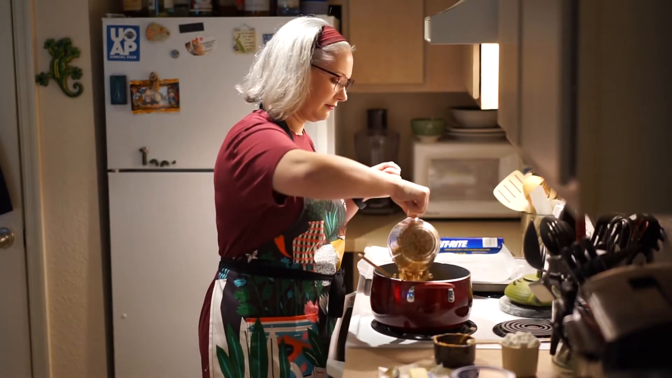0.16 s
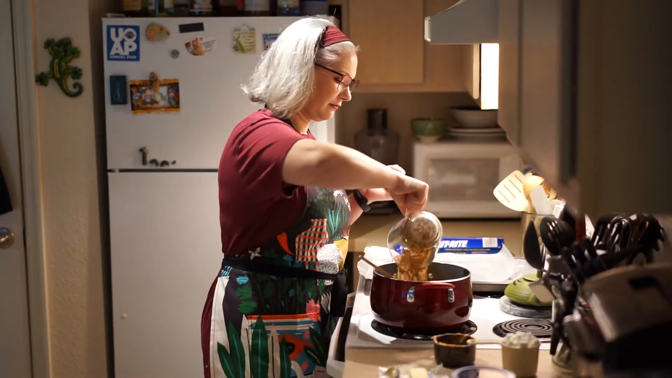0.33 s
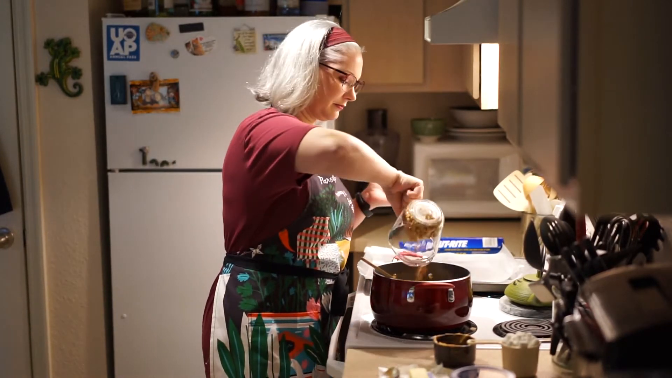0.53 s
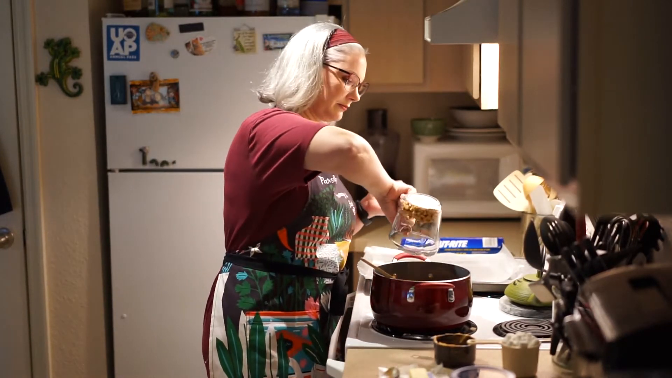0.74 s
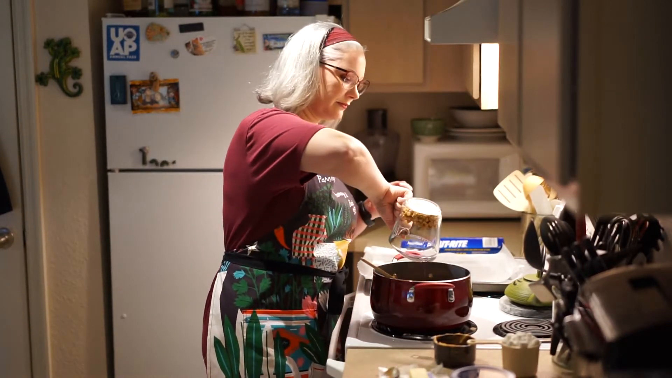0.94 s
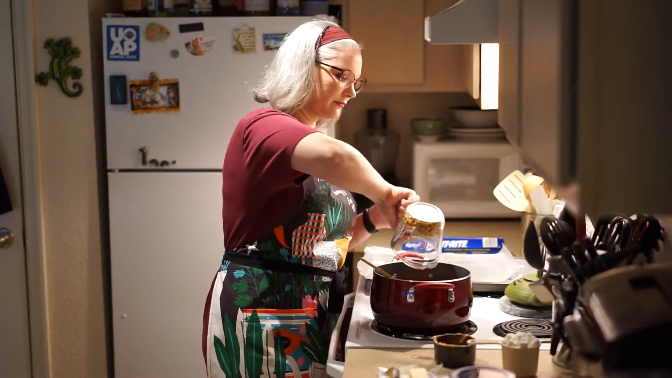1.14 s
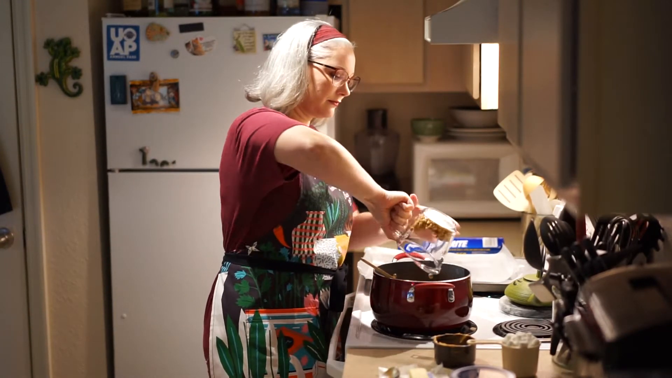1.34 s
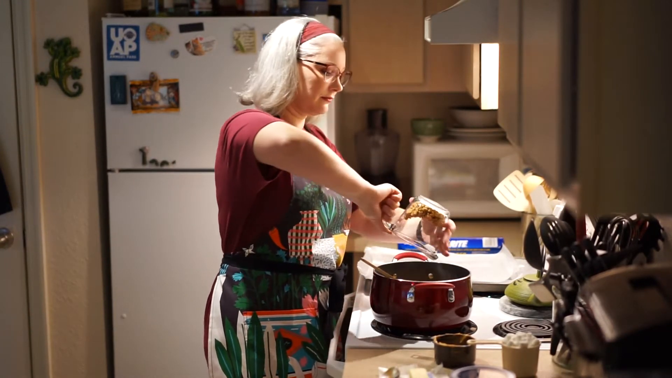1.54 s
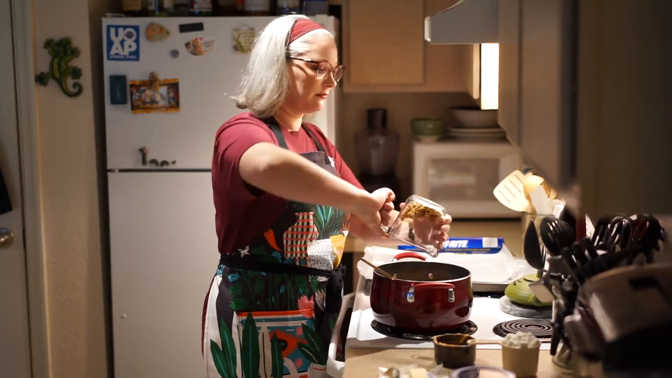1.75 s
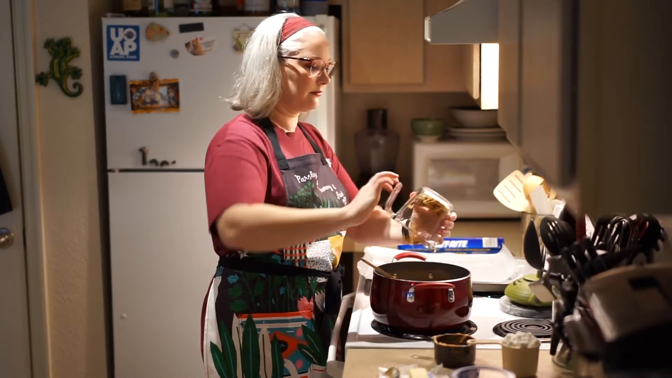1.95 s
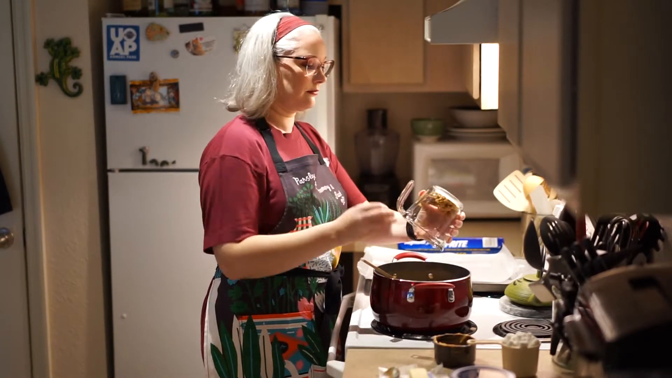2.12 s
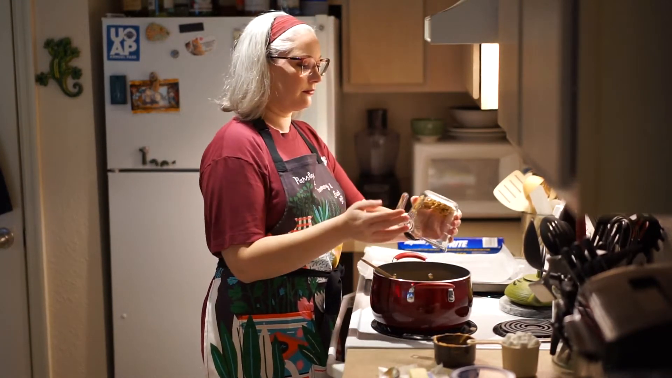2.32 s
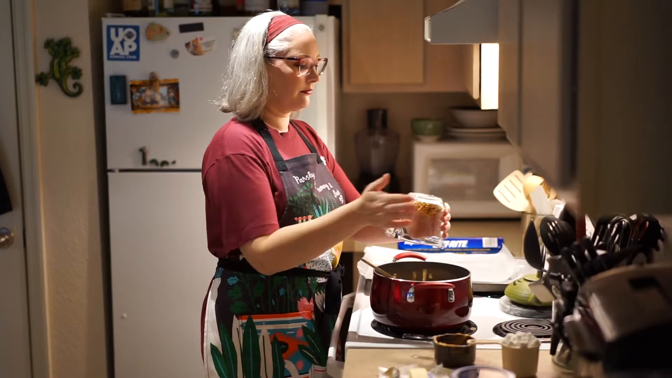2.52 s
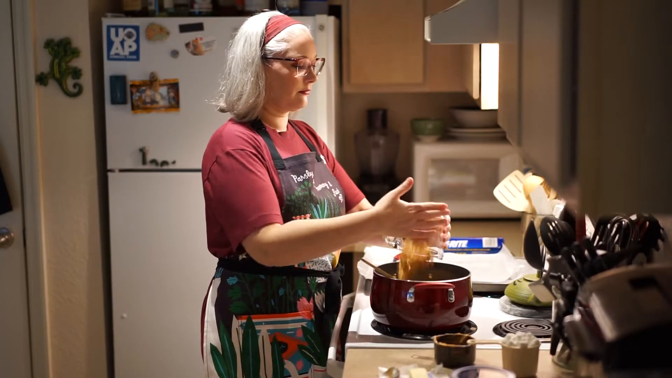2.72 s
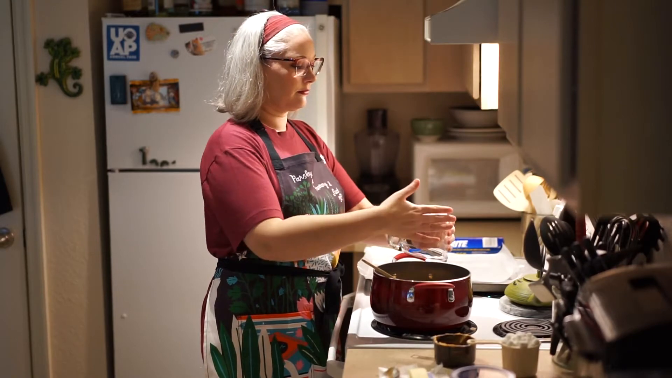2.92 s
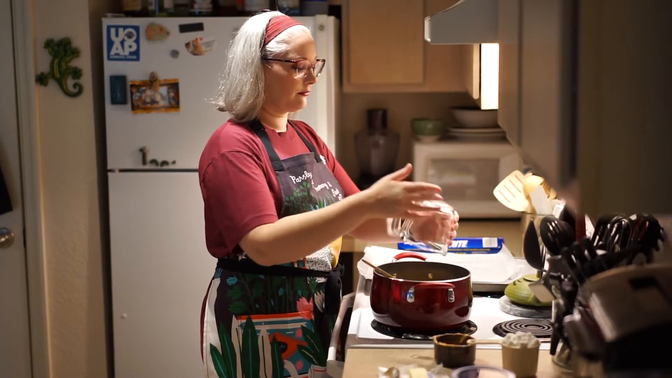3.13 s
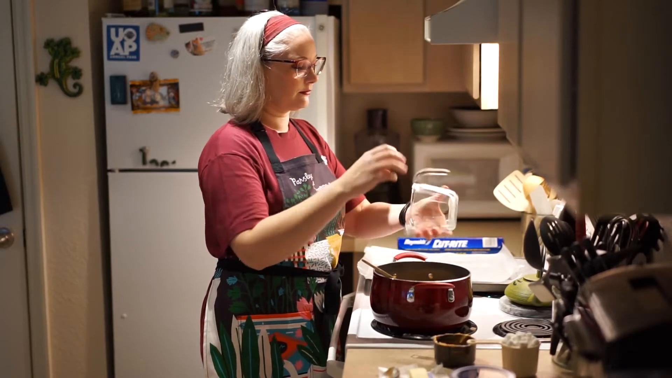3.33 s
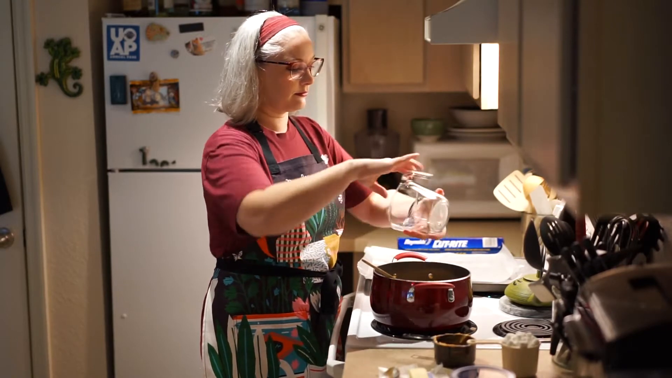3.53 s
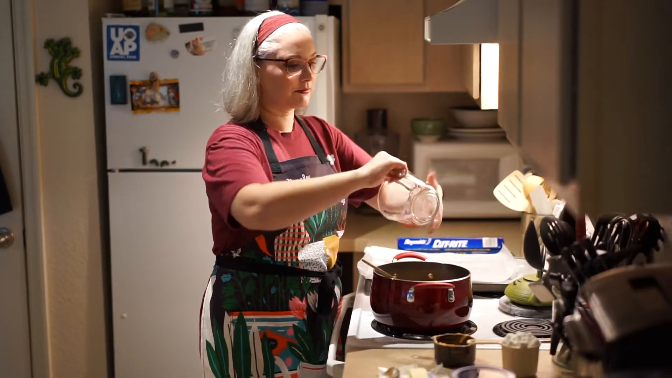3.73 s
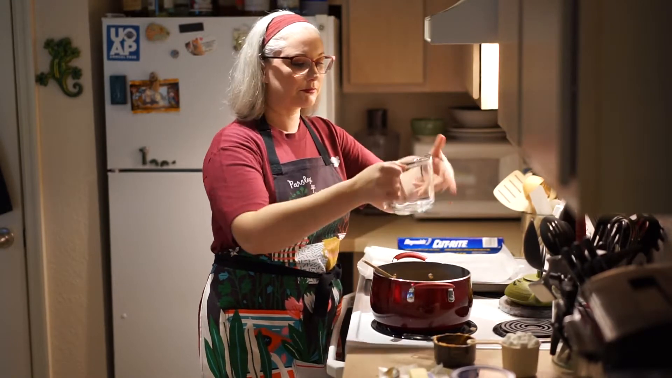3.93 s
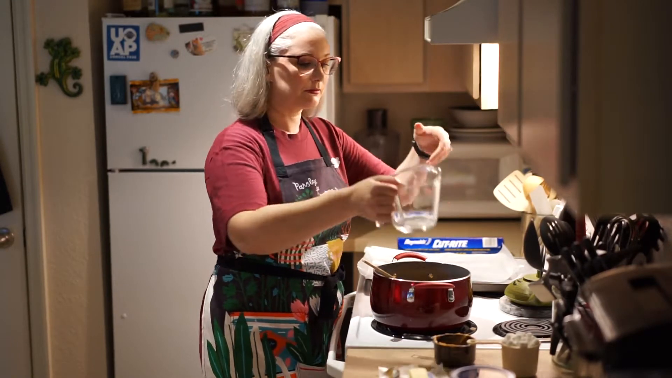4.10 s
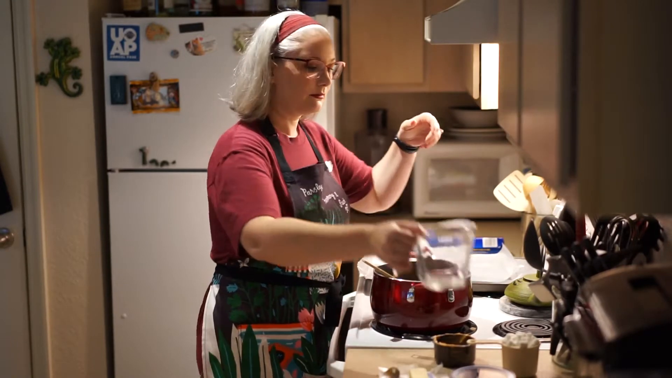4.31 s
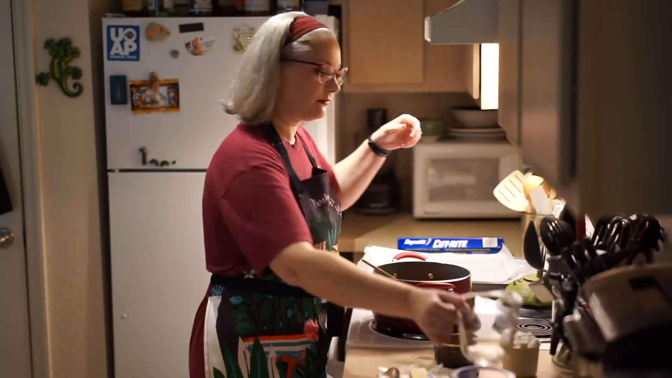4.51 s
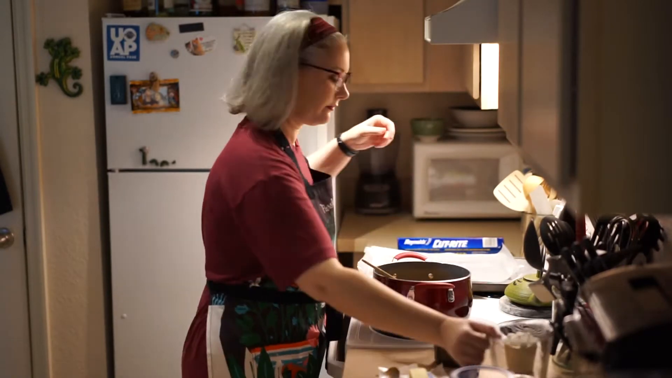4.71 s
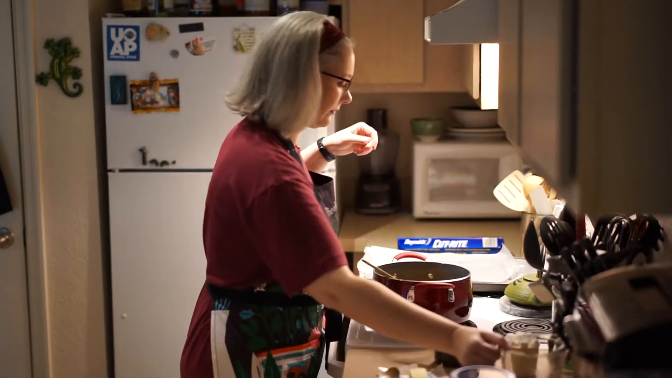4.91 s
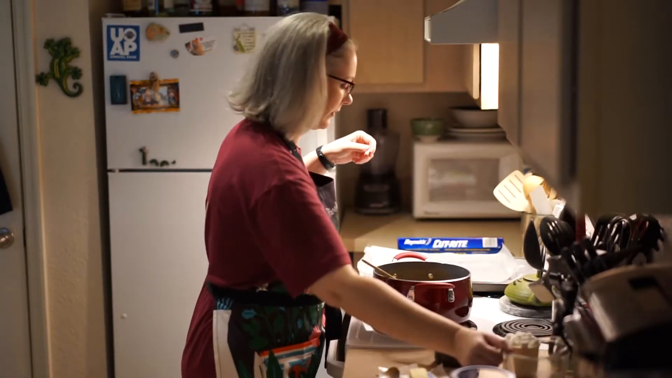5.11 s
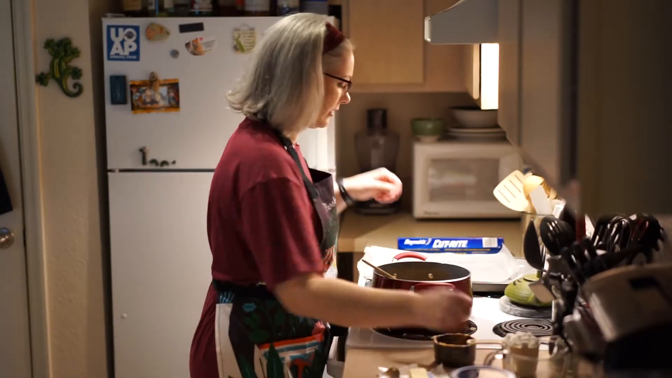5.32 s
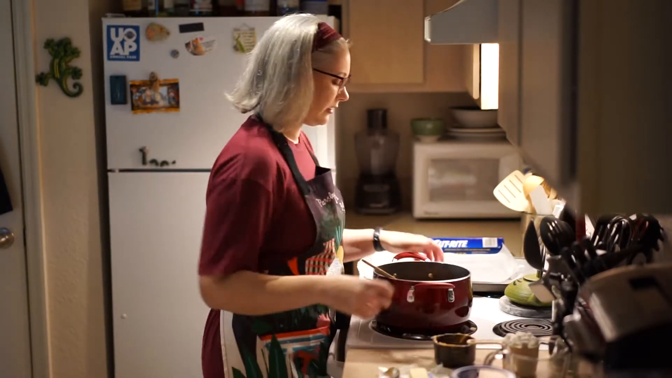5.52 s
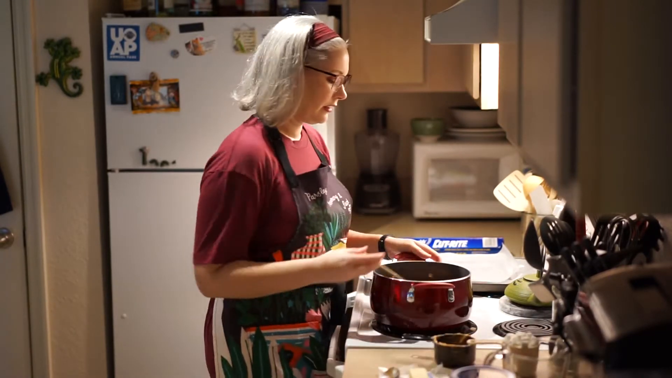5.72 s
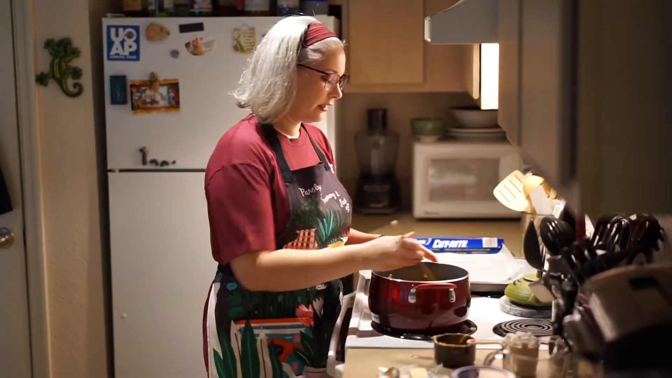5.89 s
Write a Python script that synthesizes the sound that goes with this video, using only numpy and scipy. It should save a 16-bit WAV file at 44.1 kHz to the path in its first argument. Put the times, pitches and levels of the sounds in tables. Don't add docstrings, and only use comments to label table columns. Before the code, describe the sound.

Close stereo pickup in a small echoing kitchen with low refrigerator hum. Dry hard chips stream from a glass jug into a metal pot, thin out, then burst out in loud shakes. Sparser rattles and a palm slap follow, then a pause, one sharp double knock of the jug on a wooden counter, and a faint cloth rustle.

```python
import sys
import numpy as np
from scipy import signal
from scipy.io import wavfile

SR = 44100
rng = np.random.default_rng(int(sys.argv[2]) if len(sys.argv) > 2 else 0)


def magnitude_from_level(level_db):
    exponent = np.asarray(level_db, float) / 20
    return 10 ** exponent


def store_pcm(level_fs):
    pcm = np.round(np.clip(level_fs, -1, 1) * 32767).astype(np.int16)
    wavfile.write(sys.argv[1], SR, np.atleast_2d(pcm).T)


N = 262515

BAND_EDGES = 22 * 2 ** np.arange(0, 9.7, .4)

# [f/Hz, level/dB per Hz]
PATTER = [(350, -30), (600, -19), (790, -12.5), (931, -11.5), (1070, -17), (1780, -8), (1880, -8),
          (3630, -9.5), (9110, -17), (14500, -39.5), (16000, -50)]
# [f/Hz, level/dB, t60/s]
POT = [(485.6, 0.1, 0.12), (795, -9.5, 0.077), (1060, -3.5, 0.16), (1630, -2, 0.062), (1880, 1, 0.016),
       (2140, -12, 0.035), (2540, -12, 0.03), (2730, -15, 0.034)]
# [f/Hz, level/dB, t60/s]
GLASS = [(3154, 2, 0.007), (3600, -18.5, 0.068), (3780, 4, 0.0086), (3900, -14.5, 0.019), (4650, -10, 0.02),
         (5000, -5, 0.018), (5130, -6, 0.017), (6150, 1, 0.0086), (6485, -5, 0.012), (6870, -7, 0.013),
         (7330, -12, 0.022), (7730, -11, 0.02)]
# [t/s, level/dB]
POUR = [
    (0.0, -25),
    (0.06, -31),
    (0.15, -30.5),
    (0.36, -33.5),
    (0.41, -34),
    (0.435, -30),
    (0.55, -39),
    (0.605, -43.5),
]
# [t/s, hold/s, level/dB, treble level/dB, glass level/dB]
SURGES = [(0.61, 0.069, -30, -5, 4), (0.705, 0.077, -25, -0.5, 7.5), (0.824, 0.1, -38, -5, -20),
          (1.276, 0.0034, -29.5, 4.5, -25), (1.33, .02, -41, -4, -19), (1.567, 0.025, -48.5, 5.5, -20),
          (1.891, 0.0023, -24.5, -21, 3), (1.905, 0.084, -36.5, -12, -1), (2.076, 0.051, -24.5, 0.9, 5),
          (2.136, 0.037, -42, -14, 13), (2.58, 0.05, -49, 2.5, -15), (2.63, 0.0037, -32, 0, 3),
          (2.751, 0.019, -48.5, 4.5, -11), (2.801, 0.043, -22, 2.5, 6.5), (2.84, .05, -42, 9, -5),
          (2.889, 0.15, -39, 3, -14)]
# [f/Hz, level/dB per Hz]
HUM = [(12, -40), (20, -5.5), (102, -7), (147, -10), (250, -12.5), (350, -12), (380, -31), (414, -12),
       (766, -14), (834, -16.5), (1070, -22.5), (1380, -23.5), (3030, -30), (15000, -40), (16300, -52)]
# [f/Hz, width/Hz, level/dB]
DRONES = [(95.9, 8.6, -53.5), (122.5, 9.2, -55), (248.7, 8.4, -63), (360.3, 20, -60), (452, 28, -61)]
# [f/Hz, correlation/1]
HUM_LIKENESS = [(60, 0.91), (180, 0.79), (550, 0.81), (1650, 0.53), (4970, -1.07), (15000, -0.08)]
# [f/Hz, t60/s, echo level/dB]
ROOM = [(100, 0.95, -9), (422, 0.4, -0.5), (1500, 0.29, -1.5), (4000, 0.34, -0.5), (7700, 0.36, 2.5),
        (14000, 0.25, 6.5)]
# [f/Hz, correlation/1]
ROOM_LIKENESS = [(200, 1), (800, 0.84), (2000, 0.34), (6000, 0.08)]
# [t/s, lowest mode level/dB, higher modes level/dB]
DROPS = [(0.014, -51, -41), (0.046, -24, -39), (0.108, -21, -35), (0.133, -47, -33.5), (0.181, -51, -37),
         (0.226, -28.5, -35.5), (0.292, -28, -44), (0.332, -42, -38), (0.368, -31, -55), (0.5, -28, -44),
         (0.576, -49, -46), (2.083, -34.5, -37), (2.109, -39, -50), (2.814, -22.5, -38), (2.835, -34, -54),
         (2.859, -58, -38.5)]
# [t/s, level/dB, f/Hz, t60/s]
TINKS = [(0.044, -25.5, 1060, 0.11), (0.129, -35, 1055, 0.086), (0.184, -38, 1045, .08),
         (2.911, -45, 1060, 0.12), (1.166, -58, 8300, .16), (1.499, -44, 3466, 0.091),
         (1.499, -57, 6550, 0.061), (1.499, -61, 10600, 0.052), (1.568, -46.5, 1060, 0.17),
         (1.897, -29, 820, 0.066), (2.121, -40, 349, 0.32), (2.635, -27, 1396, 0.05),
         (2.812, -31, 414, 0.088), (2.838, -37.5, 350, 0.14), (4.381, -52, 1410, 0.14)]
# [t/s, peak level/dB, colour f/Hz]
POUR_CLUMPS = [(0.0574, -15.5, 3180), (0.1396, -15.5, 3720), (0.17, -16.5, 3780), (0.1824, -15, 3940),
               (0.2031, -17, 3150), (0.2583, -16.5, 3880), (0.2794, -18.5, 3840), (0.3262, -28, 3600),
               (0.3494, -23, 3680), (0.3785, -22, 3720), (0.3884, -18.5, 3850), (0.4289, -14, 3780),
               (0.4734, -43, 3800)]
# [t/s, peak level/dB, colour f/Hz, treble level/dB]
SHAKE_CLUMPS = [(0.6104, -11.5, 3900, -2), (0.6482, -13.5, 3070, -3), (0.6683, -13.5, 3450, 3),
                (0.6839, -10.5, 3550, 4), (0.7099, -8, 3530, -7), (0.7688, -11, 3460, 6.5),
                (0.8793, -29.5, 3440, -19), (0.9966, -34.5, 3120, 4.5), (1.1676, -43, 8300, -10),
                (1.273, -19, 4900, 11.5), (1.3314, -31, 2610, -14), (1.499, -34, 6360, -12),
                (1.571, -42, 3040, 16.5), (1.8904, -8, 3600, -3.5), (2.0756, -15, 5270, 12),
                (2.1037, -11.5, 3960, -6), (2.147, -12.5, 3020, 2), (2.153, -9.5, 3100, -2),
                (2.5775, -39, 3260, -6), (2.605, -31.5, 3730, 7.5), (2.7606, -49, 4330, -6),
                (2.7971, -9.5, 6750, -13), (2.8075, -11, 5040, 0), (2.8214, -10.5, 2880, 13.5),
                (2.9183, -16, 7600, 9)]
# [t/s, level/dB, decay/s]
SLAPS = [
    (2.6333, -11.5, 0.0019),
    (2.637, -19.5, 0.0056),
]
# [f/Hz, level/dB per Hz]
PALM = [(290, -38), (500, -15), (936, -16), (1300, 2), (1700, -1.5), (2220, -4), (3200, -16), (6500, -31),
        (14000, -41)]
# [t/s, push level/dB, rough contact level/dB]
KNOCKS = [
    (4.9335, -3, -10.5),
    (4.9525, -10.5, -14.5),
    (4.987, -33, -22.5),
    (5.017, -26, -25),
]
# [f/Hz, level/dB, t60/s]
COUNTER = [(433, 16, 0.0085), (131, -27, 0.3), (179, -18, .6), (198, -15, 0.68), (279.7, -12, 0.75),
           (350, -20, 0.11), (397, -5.5, 0.14), (515, -3.5, 0.14), (568, -3.5, 0.096), (617, -11, .17),
           (621, -15, 0.11), (846, -14, 0.099), (958, -7.5, 0.12), (1160, -10, 0.045)]
# [f/Hz, level/dB per Hz]
THUD = [(40, -21), (100, -21), (200, -2), (380, -5.5), (600, 2), (1000, -6.5), (2000, -19), (3500, -32.5),
        (6000, -36), (8500, -54), (12000, -55), (16000, -60)]
# [f/Hz, level/dB, t60/s]
JUG_BASE = [(4480, -41.5, .03), (8170, -46, 0.015), (8300, -50, .03), (9830, -47, .015), (9850, -45, 0.014),
            (13880, -59, .04), (14300, -60, .02)]
# [f/Hz, level/dB per Hz]
CLOTH = [(290, -7), (500, 0), (1130, -3.5), (1320, -8), (2570, -2.5), (2760, -8.5), (7260, -22),
         (15000, -45)]

LOAD_S = 0.61


def rms_one(x):
    return x / np.sqrt(np.mean(x ** 2) + 1e-20)


def at_hz(points, hz):
    table = np.array(points)
    return np.interp(np.log(hz), np.log(table[:, 0]), table[:, 1])


def band_pass(x, low, high):
    return signal.sosfilt(signal.butter(2, [low, high], "band", fs=SR, output="sos"), x)


def bank(x, spectrum):
    out = 0
    for k, (low, high) in enumerate(zip(BAND_EDGES, BAND_EDGES[1:])):
        if high > spectrum[0][0]:
            gain = magnitude_from_level(at_hz(spectrum, np.sqrt(low * high)))
            out = out + (-1) ** k * gain * band_pass(x + 1e-18, low, high)
    return out


def ring(clicks, hz, t60):
    r = magnitude_from_level(-60 / (max(t60, .002) * SR))
    w = 2 * np.pi * hz / SR
    return signal.lfilter([0, np.sin(w)], [1, -2 * r * np.cos(w), r * r], clicks + 1e-18)


def body(clicks, modes):
    return sum(magnitude_from_level(db) * ring(clicks * rng.standard_normal(len(clicks)), hz, t60)
               for hz, db, t60 in modes)


def grains(per_s, spread_db):
    sizes = magnitude_from_level(spread_db * np.minimum(rng.exponential(1, N), 4)) * rng.choice([-1, 1], N)
    return rms_one(sizes * (rng.random(N) < per_s / SR))


def blows(rows):
    return sum(magnitude_from_level(row[1]) * (np.arange(N) == round(row[0] * SR)) for row in rows)


def burst(s, db, length):
    out, t = np.zeros(N), np.arange(1500) / SR
    start = round(s * SR)
    decay = np.exp(-t / max(length, .0005))
    out[start:start + len(t)] = rng.standard_normal(len(t)) * decay * magnitude_from_level(db)
    return out


def tilted(contacts, treble):
    dull = signal.sosfilt(signal.butter(4, 8500, fs=SR, output="sos"), contacts)
    return dull + treble * (contacts - dull)


def bottom(clicks):
    hz, db, t60 = POT[0]
    t = np.arange(len(clicks)) / SR
    sinking_hz = hz - 31 * np.minimum(t / LOAD_S, 1)
    turn = np.exp(2j * np.pi * np.cumsum(sinking_hz) / SR)
    envelope = signal.lfilter([1], [1, -magnitude_from_level(-60 / (t60 * SR))], clicks / turn + 1e-18)
    return np.imag(turn * envelope)


def pot_wall(clicks, modes):
    t = np.arange(len(clicks)) / SR
    bare = magnitude_from_level(-13 * np.clip(t / LOAD_S - 1, 0, 1))
    lowest = magnitude_from_level(modes[0][1]) * bottom(clicks * bare * rng.standard_normal(len(clicks)))
    return lowest + body(clicks, modes[1:])


def surge(hold, db):
    age = np.arange(SR // 2) / SR
    level_db = db - 21 * age - 600 * np.maximum(age - hold, 0)
    attack = np.clip(age / 0.0074 + .5, 0, 1)
    return magnitude_from_level(np.minimum(level_db, db)) * attack, np.clip(age, 0, .3)


def flows():
    t = np.arange(N) / SR
    pour = magnitude_from_level(np.interp(t, *np.transpose(POUR), left=-200, right=-200))
    pot_db = 1.0 - 13 * t
    out = pour * np.array([np.ones(N), np.full(N, magnitude_from_level(-0.3)), magnitude_from_level(pot_db), np.full(N, magnitude_from_level(1.5))])
    for start, hold, db, treble_db, glass_db in SURGES:
        level, age = surge(hold, db)
        treble = magnitude_from_level(treble_db - 40 * age)
        where = slice(round(start * SR), round(start * SR) + len(age))
        out[:, where] += [level, level * treble, level * magnitude_from_level(-11), level * magnitude_from_level(glass_db)]
    return out


def streams():
    patter, bright, pot, glass = flows()
    contacts = grains(per_s=1500, spread_db=2.5)

    def level(tool, table):
        return np.std(tool(contacts[:SR], table))

    chips = bank(tilted(contacts, bright / (patter + 1e-12)) * patter, PATTER)
    return (chips / level(bank, PATTER) * magnitude_from_level(-4.5)
            + pot_wall(contacts * pot, POT) / level(pot_wall, POT) * magnitude_from_level(-8.0)
            + body(contacts * glass, GLASS) / level(body, GLASS) * magnitude_from_level(-11.0))


def stereo_bands(size, likeness):
    white = rng.standard_normal((2, 2, size))
    for k, (low, high) in enumerate(zip(BAND_EDGES, BAND_EDGES[1:])):
        centre = np.sqrt(low * high)
        mid, side = band_pass(white[k % 2], low, high)
        alike = np.clip(at_hz(likeness, centre), 0, 1)
        yield centre, np.sqrt(1 + alike) * mid + np.sqrt(1 - alike) * side * [[1], [-1]]


def hum():
    air = rms_one(sum(magnitude_from_level(at_hz(HUM, hz)) * band for hz, band in stereo_bands(N, HUM_LIKENESS)))
    drones = sum(magnitude_from_level(db) * rms_one(ring(rng.standard_normal(N), hz, 2.55 / width))
                 for hz, width, db in DRONES)
    return magnitude_from_level(-49) * air + drones


def kitchen(x, gap_s, early_db, early_s):
    t, tail, room = np.arange(SR // 2) / SR, 0, np.array(ROOM)
    for hz, band in stereo_bands(len(t), ROOM_LIKENESS):
        early = magnitude_from_level(early_db) * min(hz / 2500, 1) * np.exp(-t / early_s)
        shape = np.clip(t / gap_s, 0, 1) * (1 + early) * magnitude_from_level(-60 * t / at_hz(room, hz))
        echo_gain = magnitude_from_level(at_hz(room[:, ::2], hz))
        tail = tail + band * shape * echo_gain / np.sqrt(np.sum(shape ** 2))
    return signal.fftconvolve(x[None], tail / np.sqrt(1.4), axes=1)[:, :N]


def drops():
    clusters = sum(burst(s, higher_db, length=0.0048) for s, db, higher_db in DROPS)
    return magnitude_from_level(-3.0) * bottom(blows(DROPS)) + magnitude_from_level(-15.5) * body(clusters, POT[1:])


def tinks():
    out, t = np.zeros(N + SR), np.arange(SR // 2) / SR
    for s, db, hz, t60 in TINKS:
        start = round(s * SR)
        decay = magnitude_from_level(db - 60 * t / max(t60, .002))
        out[start:start + len(t)] += decay * np.sin(2 * np.pi * hz * t)
    return out[:N]


def clumps():
    broad, own, glass = np.zeros(N), np.zeros(N), np.zeros(N)
    # treble where missing, own colour and glass, all level/dB
    rows = [(*row, -8, -14, -12.5) for row in POUR_CLUMPS]
    rows += [(*row, -17.5, -12.5) for row in SHAKE_CLUMPS]
    for s, db, hz, treble_db, own_db, glass_db in rows:
        where = slice(round(s * SR), round(s * SR) + 2000)
        hits = burst(s, db, length=0.0036)[where]
        broad[where] += tilted(hits, magnitude_from_level(treble_db + 10.5))
        own[where] += magnitude_from_level(own_db) * ring(hits, hz, 16.0 / hz)
        glass[where] += hits * magnitude_from_level(glass_db)
    return magnitude_from_level(-13.0) * bank(broad, PATTER) + own + magnitude_from_level(-19) * body(glass, GLASS)


def slap():
    return magnitude_from_level(6.0) * bank(sum(burst(*row) for row in SLAPS), PALM)


def knock():
    push = signal.sosfilt(signal.butter(2, 1100, fs=SR, output="sos"), blows(KNOCKS) + 1e-18)
    modes = sum((-1) ** (k + 1) * magnitude_from_level(db) * ring(push, hz, t60)
                for k, (hz, db, t60) in enumerate(COUNTER))
    rough = sum(burst(s, rough_db, length=0.0028) for s, db, rough_db in KNOCKS)
    first_s, _, first_db = KNOCKS[0]
    base = body(burst(first_s, first_db, length=0.0097), JUG_BASE)
    thud = magnitude_from_level(-9.0) * modes + magnitude_from_level(20.5) * bank(rough, THUD) + base
    return signal.sosfilt(signal.butter(3, 75, "high", fs=SR, output="sos"), thud)


def rustle():
    age = np.arange(N) / SR - 5.872
    level_db = -42 + np.minimum(247 * age, -130 * age)
    return magnitude_from_level(level_db) * rms_one(bank(grains(per_s=6000, spread_db=4.0), CLOTH))


def scene():
    no_bass = signal.butter(3, 280, "high", fs=SR, output="sos")
    flowing = signal.sosfilt(no_bass, streams())
    landing = signal.sosfilt(no_bass, clumps() + drops() + tinks() + slap())
    near = knock() + rustle()
    direct = (flowing + landing) * magnitude_from_level(np.array([[-4.6], [-1.6]]))   # left, right in dB
    direct = direct + near * magnitude_from_level(np.array([[-1.3], [-.7]]))
    echo = sum(kitchen(spot, gap_s=0.0014, early_db=3.0, early_s=0.0075)
               for spot in (flowing + near, landing))
    return direct + echo * magnitude_from_level(np.array([[-.5], [.5]])) + hum()


def band_limit(x):
    return signal.sosfilt(signal.butter(12, 16450, fs=SR, output="sos"), x)


def record(dry):
    top_cut = signal.sosfilt(signal.cheby2(8, 40, 16300, fs=SR, output="sos"), dry)
    return band_limit(np.clip(top_cut, -1, 1))


dry = scene()
out = record(dry)
store_pcm(out)
```